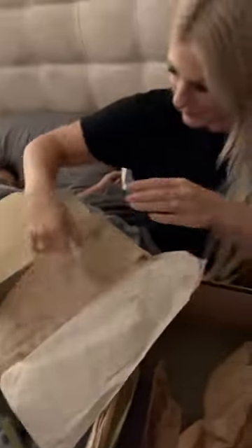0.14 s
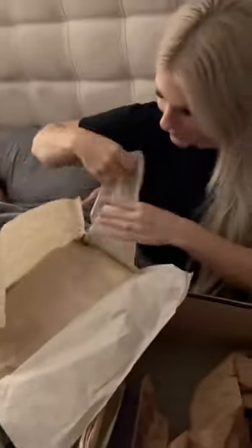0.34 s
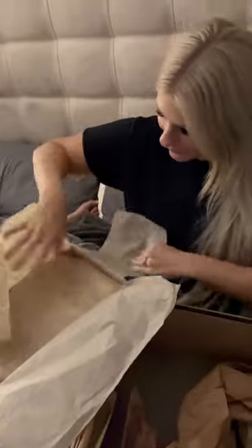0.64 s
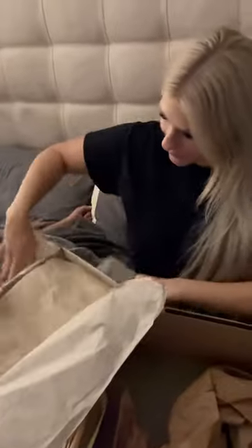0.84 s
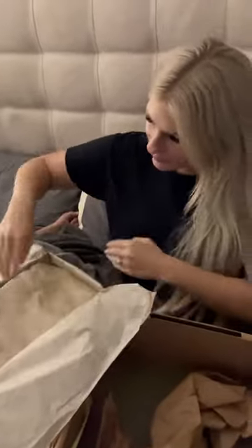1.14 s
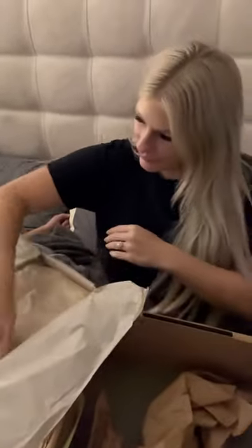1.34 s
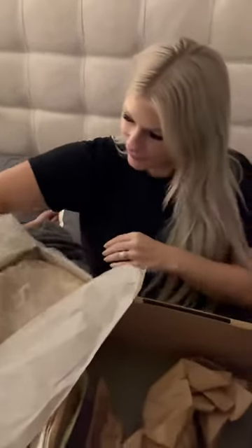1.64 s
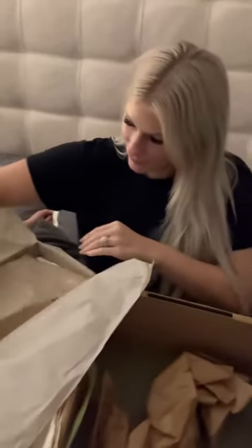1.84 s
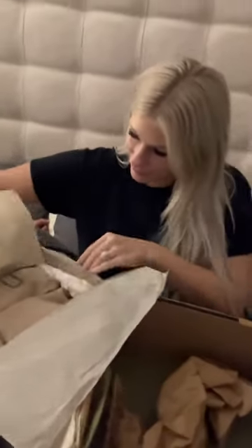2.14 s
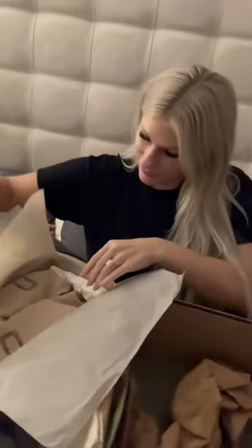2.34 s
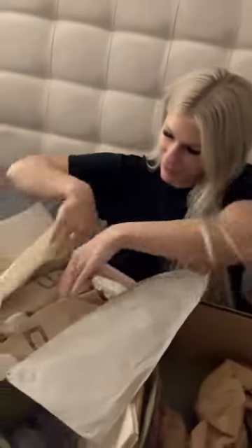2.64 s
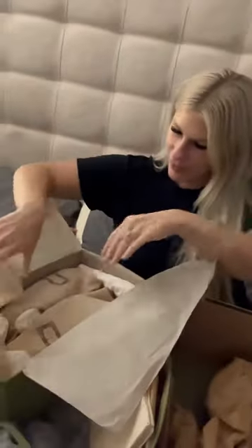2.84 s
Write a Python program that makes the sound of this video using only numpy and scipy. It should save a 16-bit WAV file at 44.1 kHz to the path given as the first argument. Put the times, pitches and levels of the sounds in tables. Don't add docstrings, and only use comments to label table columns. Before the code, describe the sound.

Tissue paper rustles and crackles as hands pull it open in uneven bursts, close up

```python
import sys
import numpy as np
from scipy import signal
from scipy.fft import rfft, irfft
from scipy.io import wavfile
from scipy.ndimage import uniform_filter1d

SR = 44100
rng = np.random.default_rng(int(sys.argv[2]) if len(sys.argv) > 2 else 0)


def unload_audio(sound):
    columns = np.transpose(np.atleast_2d(sound))
    steps = np.round(np.clip(columns, -1, 1) * 32767)
    wavfile.write(sys.argv[1], SR, steps.astype(np.int16))


def undo_db(level):
    steps = np.asarray(level, float) / 20
    return 10 ** steps


N = 3 * SR


def evened(x):
    return x / np.sqrt(np.mean(x ** 2) + 1e-20)


def read(points, hz):
    f, value = np.transpose(points)
    return np.interp(np.log(hz + 1), np.log(f + 1), value)


def colour(x, points):
    gain = undo_db(read(points, np.fft.rfftfreq(N, 1 / SR)))
    return irfft(rfft(x) * gain, N)


def slow(seconds):
    width = int(max(seconds, .001) * SR)
    once = uniform_filter1d(rng.standard_normal(N), width)
    return evened(uniform_filter1d(once, width))


def patchy(x):
    _, _, z = signal.stft(x, SR, nperseg=1024)
    field = rng.standard_normal(z.shape[::-1]).T
    field = uniform_filter1d(field, size=4, axis=0)
    field = evened(uniform_filter1d(field, size=6, axis=1))
    patch_db = 2.5
    return evened(signal.istft(z * undo_db(patch_db * field), SR, nperseg=1024)[1][:N])


def burst(start, db, rise, fade):
    u = np.maximum(np.arange(N) / SR - start + rise / 2, 0)
    fading = undo_db(2 * (db - 60 * u / max(fade, .005)))
    return np.minimum(u / rise, 1) ** 2 * fading


# pitch_hz, level_db
RUMBLE = [(20, -34), (45, 1), (100, -0.5), (240, -6), (380, -15.5), (1200, -22.5), (6000, -35),
          (14000, -71.5)]
# pitch_hz, side_over_mid_db
RUMBLE_WIDTH = [(60, -16), (240, -3.5), (950, 0), (3770, -5), (15000, -30)]


def air():
    level_db = -52
    rumble = patchy(colour(rng.standard_normal(N), RUMBLE))
    other = patchy(colour(rng.standard_normal(N), RUMBLE))
    diff = colour(other, RUMBLE_WIDTH) / np.std(rumble) * undo_db(level_db)
    mid = evened(rumble) * undo_db(level_db + 1.0 * slow(0.3))
    return mid, diff


# pitch_hz, rms_db
HUM_LINES = [(193.8, -59), (242.2, -61.5)]


def hum():
    t, out = np.arange(N) / SR, np.zeros(N)
    for hz, db in HUM_LINES:
        level = np.sqrt(2) * undo_db(db + 1.1 * slow(0.24))
        out += level * np.sin(2 * np.pi * hz * t + 0.97 * slow(0.15))
    return out


# start_s, level_db, pitch_hz
KNOCKS = [
    (1.15, -46.5, 118.8),
    (1.368, -47.5, 63.6),
    (1.972, -51, 149.6),
    (2.698, -51.5, 92),
    (1.18, -46, 61),
    (2.88, -49.5, 75.5),
]


def knocks():
    t, out = np.arange(N) / SR, np.zeros(N)
    for start, db, hz in KNOCKS:
        u = np.maximum(t - start, 0) / 0.043
        out += undo_db(db) * u * np.exp(1 - u * u) * np.sin(2 * np.pi * hz * (t - start))
    return out


def room():
    mid, diff = air()
    return mid + hum() + knocks(), diff


# start_s, level_db, left_over_right_db, sheen_db
HAND_PULL = [(0, -52.5, 2, -2.5), (.3, -45.5, 2, 4), (.74, -42, 2, -3), (.84, -34, 1, -2),
             (.97, -50, 1.5, -7.5), (1.1, -64, 2, -7), (1.312, -68, 4, -10.5), (1.35, -47, 2, -6),
             (1.74, -48.5, 0, -1.5), (1.85, -43, 9.5, -2), (2.08, -44, 11, -1), (2.209, -46.5, 7, -3),
             (2.3, -66, 2.5, -3), (2.598, -69.5, -1, -1), (2.659, -39.5, 2.5, 2), (2.72, -34, 0.5, 0),
             (2.86, -43, 1.5, -5.5), (3.0, -49.5, 3, 0.5)]


def pull():
    t = np.arange(N) / SR
    s, db, pan_db, sheen_db = np.transpose(HAND_PULL)
    level_db, flutter_db = 2, 0.55
    power = undo_db(2 * (np.interp(t, s, db) + level_db + flutter_db * slow(0.039)))
    sheen = undo_db(np.interp(t, s, sheen_db))
    side = np.tanh(np.interp(t, s, pan_db) / 12)
    return power, sheen, side


# start_s, peak_db, fade_s, fullness_db
GIVING_FOLDS = [(0.0, -24.5, 0.3, -4), (0.1146, -24, 0.1, 2.5), (0.1276, -20, 0.22, 3),
                (0.2493, -43, 0.048, -12), (0.2862, -19, 0.18, 1), (0.42, -23, 0.13, -6),
                (0.4354, -23.5, 0.12, -13), (0.552, -24, 0.13, 0.5), (0.6215, -40, 0.1, -8),
                (0.6794, -27, 0.11, -11), (0.7502, -30, 0.091, 0), (0.8114, -31, 0.15, 0),
                (0.836, -34, 0.1, 6), (1.2012, -29.5, 0.087, -13), (1.2122, -28, 0.11, -13),
                (1.3333, -30.5, 0.14, 3.5), (1.3603, -36, 0.13, 9.5), (1.451, -33.5, 0.25, 5),
                (1.5617, -28.5, 0.3, -0.5), (1.6127, -23, 0.11, 0.5), (1.7968, -26.5, 0.18, 6.5),
                (1.95, -20, 0.075, -0.5), (1.9677, -14, 0.068, 5), (2.031, -26, 0.12, 0),
                (2.1296, -18, 0.061, -3), (2.6131, -28, 0.23, -1), (2.669, -21.5, 0.21, -2),
                (2.7144, -31, 0.12, -5), (2.9175, -24, 0.18, -21), (2.9683, -25.5, 0.2, 2.5)]


def folds():
    power, dull = np.zeros(N), np.zeros(N)
    level_db, rise_s = -13, 0.0035
    for start, peak_db, fade, full_db in GIVING_FOLDS:
        give = burst(start, peak_db + level_db, rise_s, fade)
        power += give
        dull += give * undo_db(2 * full_db)
    return power, dull


# start_s, peak_db, sheen_db
LONE_TICKS = [(0.483, -33, 8.5), (0.497, -37, 11), (0.5506, -29, 11), (0.9954, -32.5, 4),
              (1.0199, -28.5, -0.5), (1.0802, -32.5, 0), (1.16, -43, -3), (1.1757, -41, -5),
              (1.343, -32, 6.5), (1.6751, -30, -2), (1.8217, -24.5, -1), (1.864, -30, 6.5),
              (1.8963, -25.5, -6), (1.9446, -18, -1), (2.2164, -29, -6), (2.2844, -48, 5),
              (2.36, -37.5, -6), (2.371, -48, 3), (2.412, -38.5, -5), (2.4474, -59, 8), (2.4813, -55, 1),
              (2.4964, -65, -7), (2.5346, -49, 1), (2.578, -47.5, 13)]


def ticks():
    power, bright = np.zeros(N), np.zeros(N)
    level_db, rise_s, fade_s = -6.5, .001, .022
    for start, peak_db, sheen_db in LONE_TICKS:
        give = burst(start, peak_db + level_db, rise_s, fade_s)
        power += give
        bright += give * undo_db(2 * sheen_db)
    return power, bright


def creases(clumps):
    per_s, spread_db, ring_cycles = 9000, 1, 2.5
    size = undo_db(spread_db * np.minimum(rng.exponential(1, N), 6)) * clumps
    size = size * rng.choice([-1., 1.], N)
    size = size * (rng.random(N) < per_s / SR)
    kind, t, out = rng.integers(0, 24, N), np.arange(256) / SR, np.zeros(N)
    pitches = np.geomspace(500, 16000, num=24) * rng.uniform(.95, 1.05, 24)
    for k, hz in enumerate(pitches):
        snap = np.cos(2 * np.pi * hz * t) * np.exp(-t * hz / ring_cycles)
        snap = snap * np.sqrt(hz) / np.linalg.norm(snap)
        out += signal.oaconvolve(size * (kind == k), snap)[:N]
    spectrum = rfft(out)
    broad = np.sqrt(uniform_filter1d(abs(spectrum) ** 2, 1500))
    return patchy(irfft(spectrum / broad, N))


# pitch_hz, level_db
FOLD_BODY = [(120, -23), (320, -1), (1200, -4.5), (3000, -8.5), (6000, -57)]


def fold_body(clumps, dull):
    return undo_db(-7.5) * evened(colour(creases(clumps), FOLD_BODY)) * np.sqrt(dull)


# pitch_hz, level_db
PAPER_SUM = [(150, -4), (600, -10.5), (4200, -0.5), (7200, -6), (8350, -20.5), (9200, -7), (12000, -2.5),
             (15400, -20.5)]
# pitch_hz, level_db
PAPER_DIFF = [(150, -12.5), (2000, -6.5), (3300, -2.5), (9500, -3.5), (11000, -10.5), (12600, -25),
              (13600, -9), (15700, -9.5)]
# pitch_hz, level_db
TOP_RANGE = [(6000, -40), (9000, 0), (16000, 0)]
# pitch_hz, level_db
FACING_LEFT = [(3000, -35), (4300, -8.5), (5200, -6), (6500, -39)]


def paper():
    power, sheen, side = pull()
    fold_power, fold_dull = folds()
    tick_power, tick_bright = ticks()
    dull = power + fold_dull
    power = power + fold_power
    sheen = np.sqrt((power * sheen ** 2 + tick_bright) / (power + tick_power))
    clumps = undo_db(1 * slow(0.0062))

    t60_s, room_db = 0.09, -5
    keep = np.exp(-2 * np.log(1000) / (t60_s * SR))
    wet = undo_db(room_db) * np.sqrt(signal.lfilter([1 - keep], [1, -keep], power + tick_power))
    noise_level = np.sqrt(tick_power + wet ** 2)

    def one_signal():
        snaps = creases(clumps) * np.sqrt(power) + noise_level * rng.standard_normal(N)
        return snaps + colour(snaps * (sheen - 1), TOP_RANGE)

    a, b = one_signal(), one_signal()
    a = a + colour(a * side, FACING_LEFT)
    norm = np.std(colour(rng.standard_normal(N), PAPER_SUM))
    mid = colour(a, PAPER_SUM) / norm + fold_body(clumps, dull)
    diff = colour(side * a + np.sqrt(1 - side ** 2) * b, PAPER_DIFF) / norm
    return mid, diff


def scene():
    mid, diff = np.array(paper()) + np.array(room())
    return np.array([mid + diff, mid - diff])


def band_limit(x):
    return signal.sosfilt(signal.butter(12, 15830, fs=SR, output="sos"), x)


# start_s, end_s
WHOLE_TREBLE = [(.11, .14), (.4, .44), (.47, .5), (.93, .97), (.99, 1.03), (1.07, 1.09), (1.15, 1.22),
                (1.32, 1.335), (1.93, 1.97), (2.26, 2.29), (2.35, 2.38), (2.405, 2.425), (2.51, 2.54),
                (2.57, 2.59)]


def record(dry):
    from_hz, gap_db, faint_db = 6800, 6, -90
    hz, t, z = signal.stft([dry[0] + dry[1], dry[0] - dry[1]], SR, nperseg=1024)
    power = (abs(z[:, :512]) ** 2).reshape(2, 64, 8, -1).sum(2)
    power = uniform_filter1d(power, size=5, axis=2)
    masked = (power < power[::-1] / undo_db(2 * gap_db)) | (power < undo_db(2 * faint_db))
    masked &= hz[:512:8, None] > from_hz
    masked &= ~np.any([(t > a) & (t < b) for a, b in WHOLE_TREBLE], axis=0)
    z[:, :512] *= 1 - np.repeat(masked, 8, axis=1)
    mid, diff = signal.istft(z, SR, nperseg=1024)[1][:, :N] / 2
    return band_limit(np.array([mid + diff, mid - diff]))


dry = scene()
out = record(dry)
unload_audio(out)
```